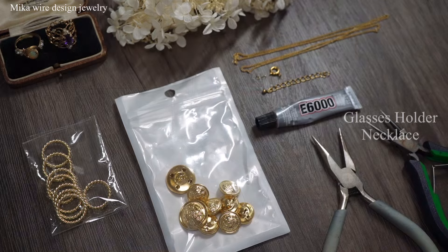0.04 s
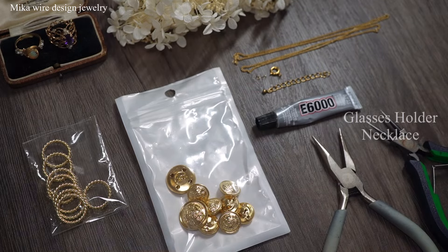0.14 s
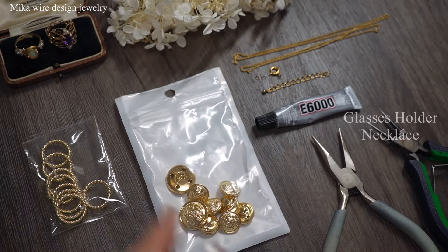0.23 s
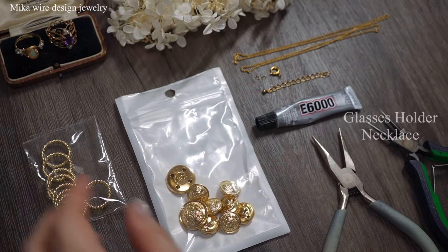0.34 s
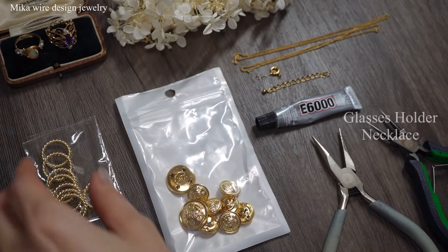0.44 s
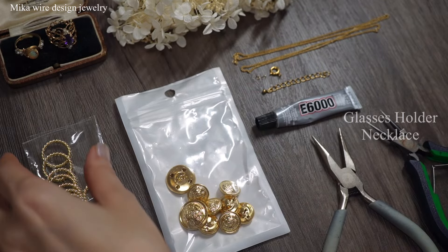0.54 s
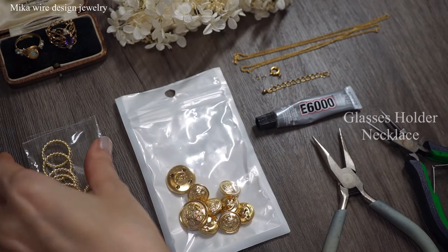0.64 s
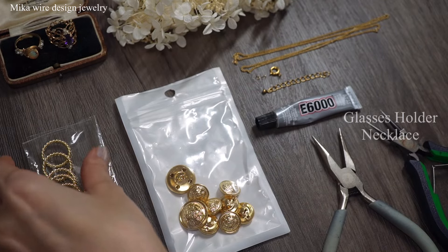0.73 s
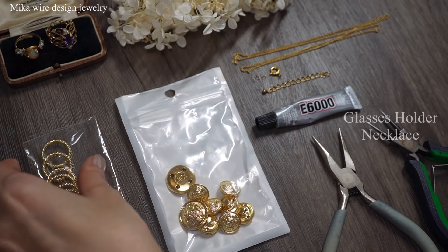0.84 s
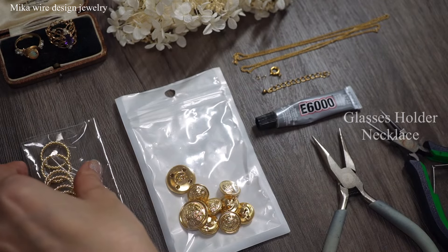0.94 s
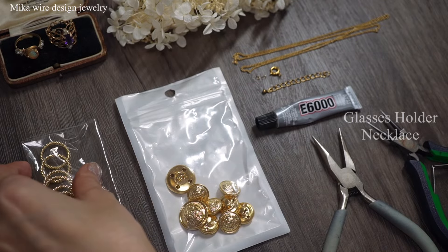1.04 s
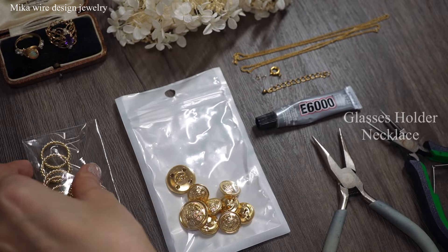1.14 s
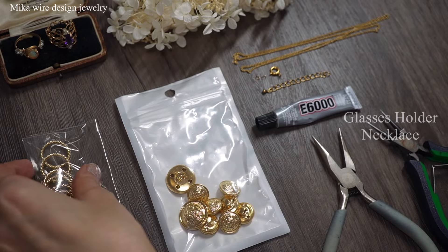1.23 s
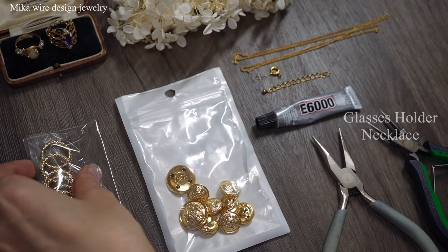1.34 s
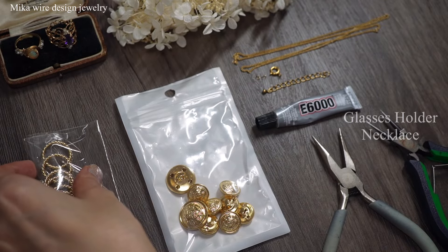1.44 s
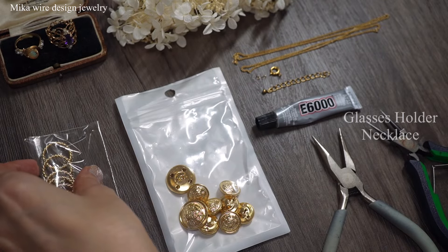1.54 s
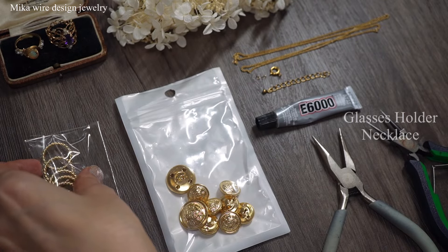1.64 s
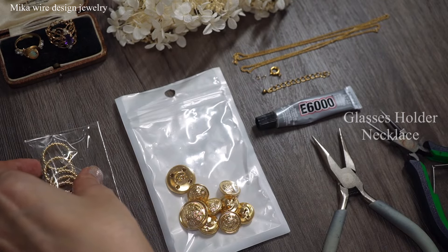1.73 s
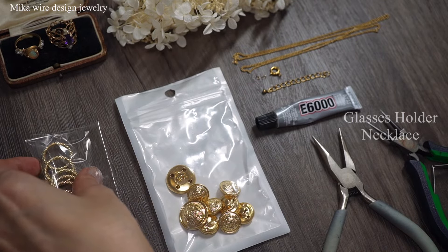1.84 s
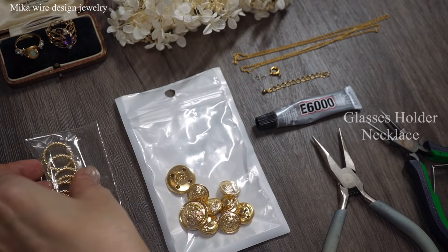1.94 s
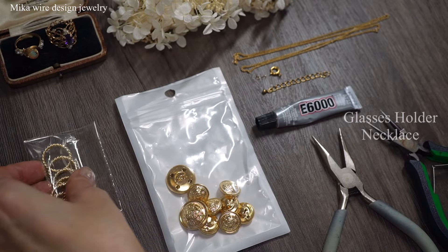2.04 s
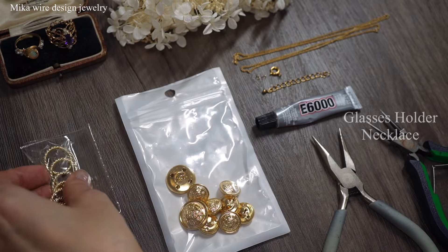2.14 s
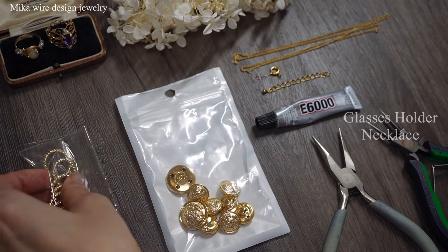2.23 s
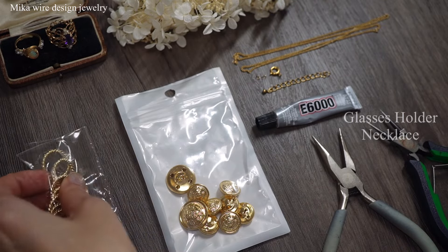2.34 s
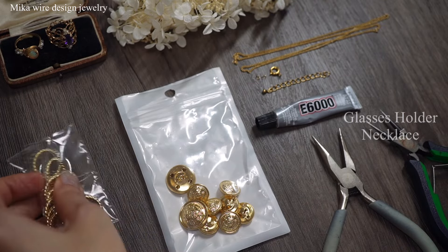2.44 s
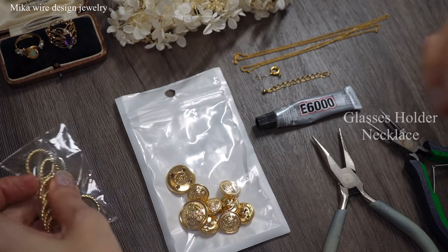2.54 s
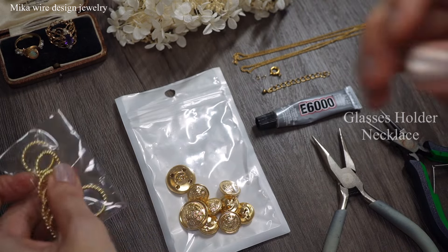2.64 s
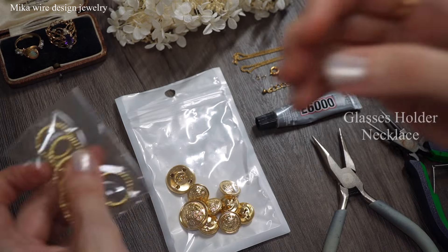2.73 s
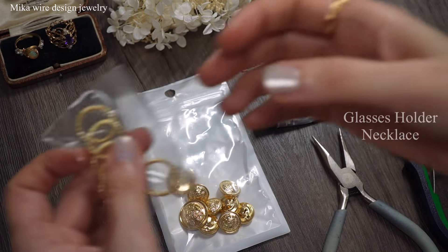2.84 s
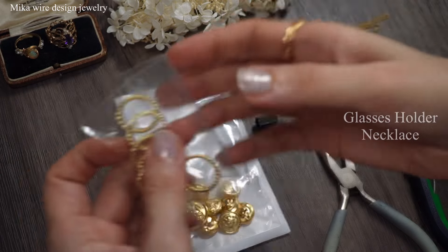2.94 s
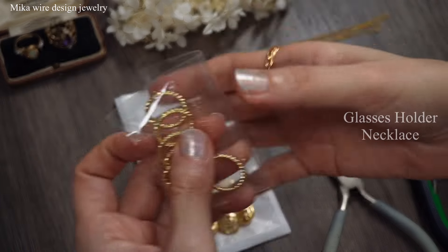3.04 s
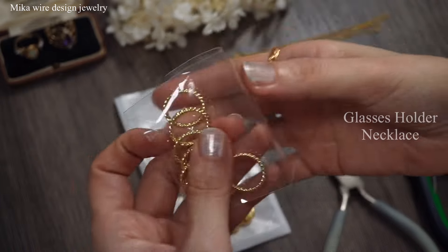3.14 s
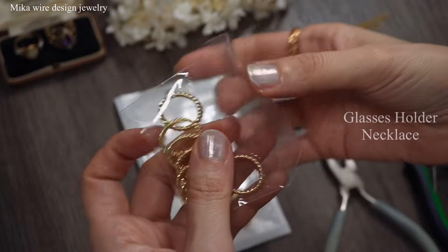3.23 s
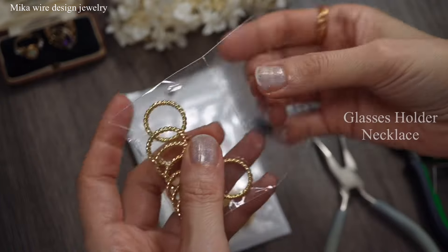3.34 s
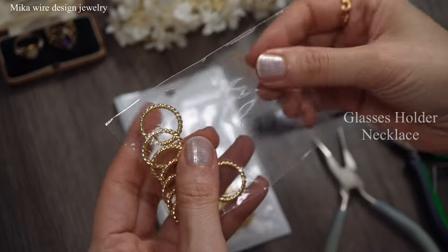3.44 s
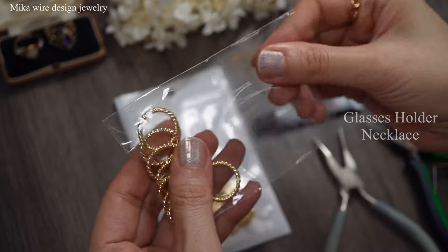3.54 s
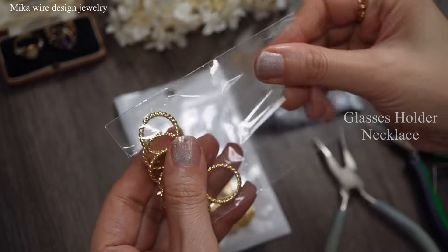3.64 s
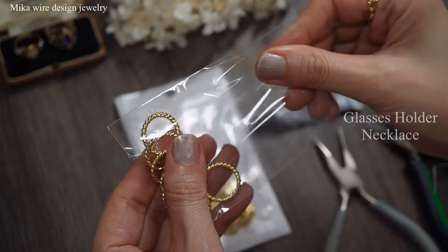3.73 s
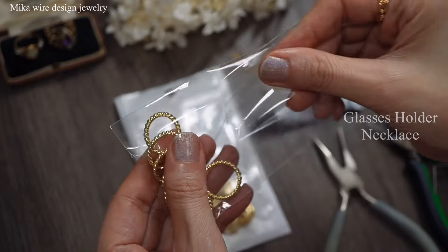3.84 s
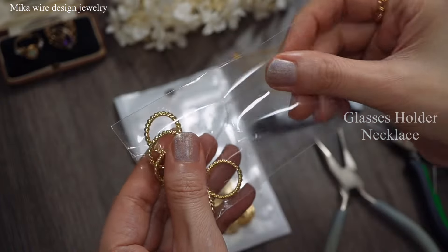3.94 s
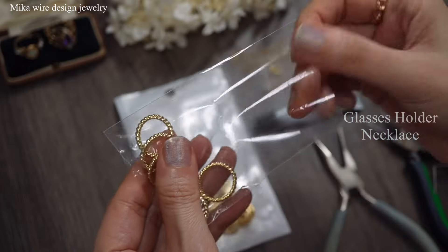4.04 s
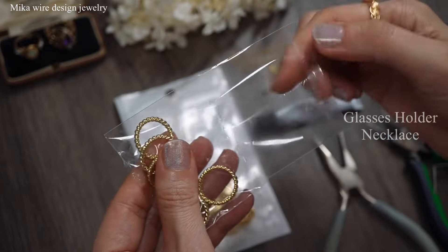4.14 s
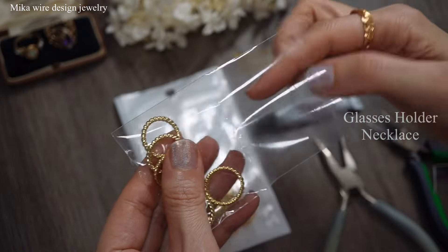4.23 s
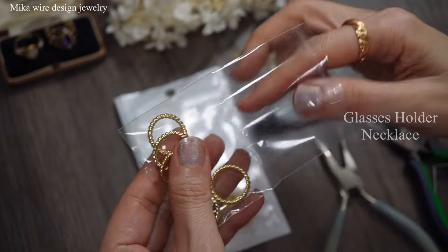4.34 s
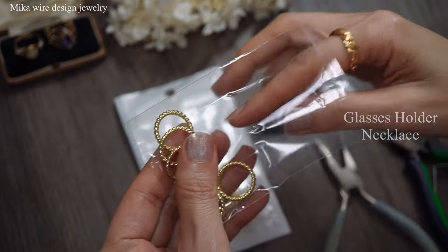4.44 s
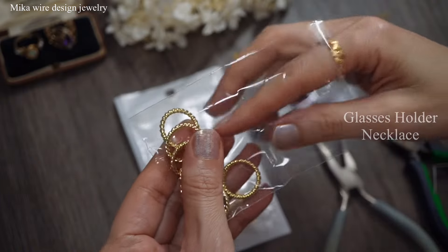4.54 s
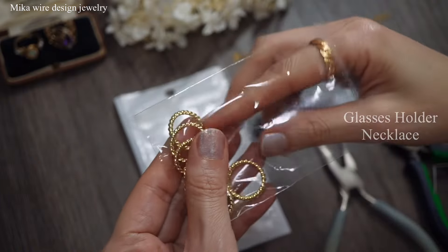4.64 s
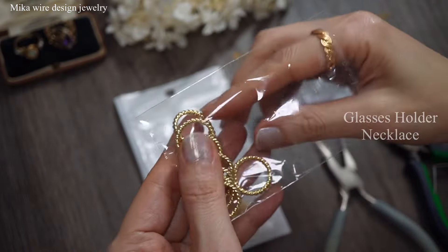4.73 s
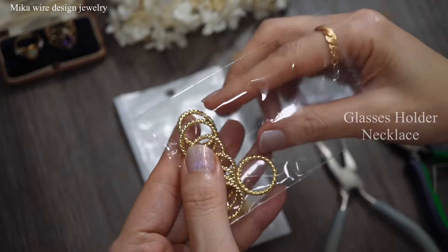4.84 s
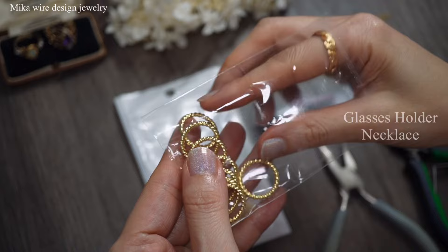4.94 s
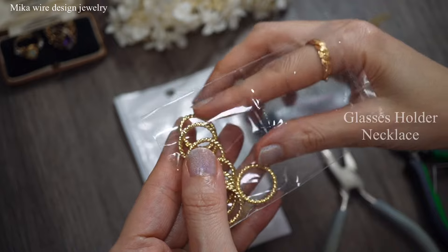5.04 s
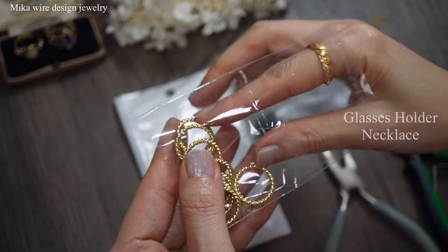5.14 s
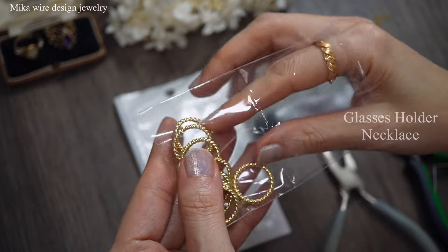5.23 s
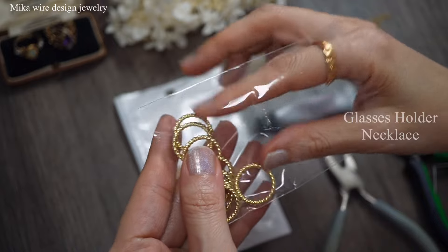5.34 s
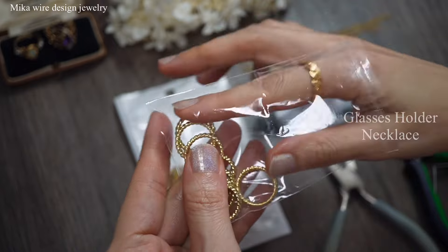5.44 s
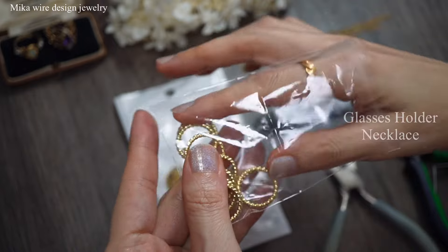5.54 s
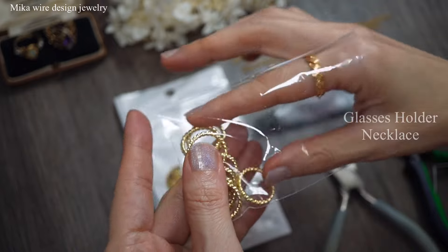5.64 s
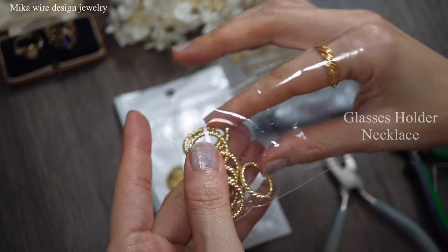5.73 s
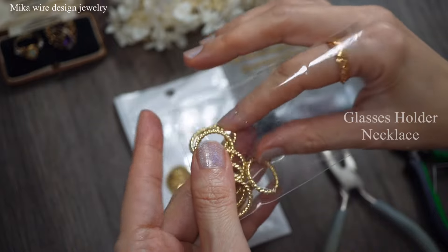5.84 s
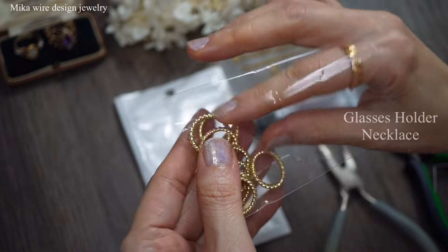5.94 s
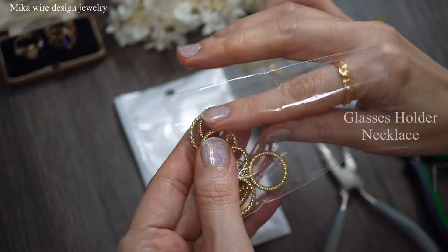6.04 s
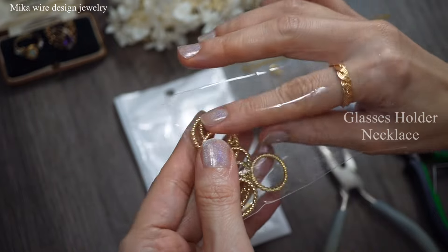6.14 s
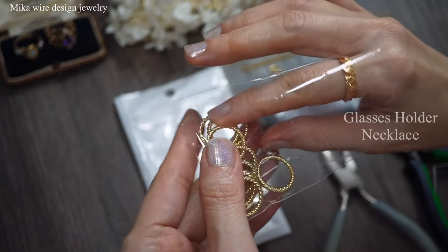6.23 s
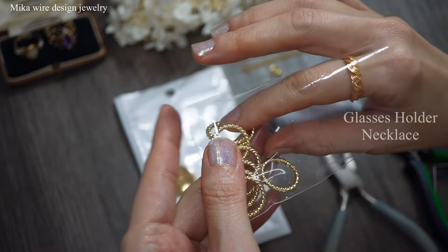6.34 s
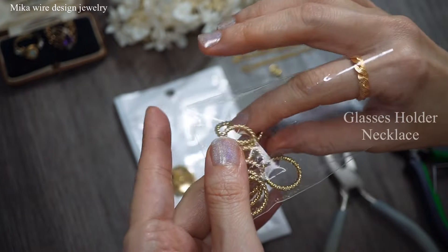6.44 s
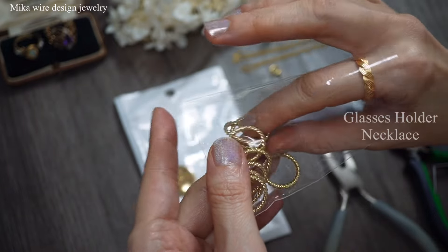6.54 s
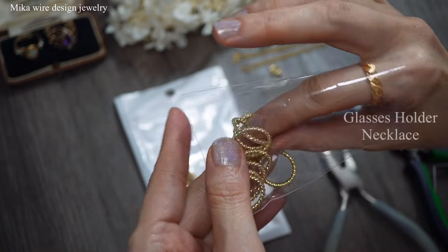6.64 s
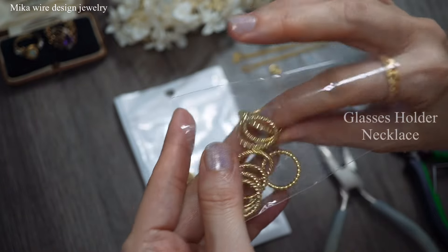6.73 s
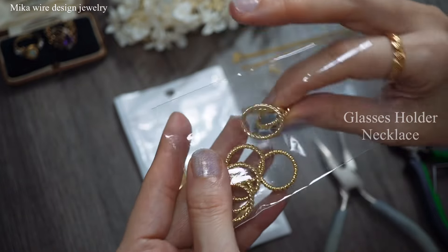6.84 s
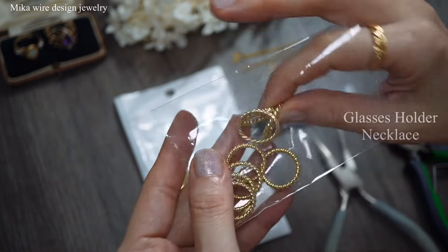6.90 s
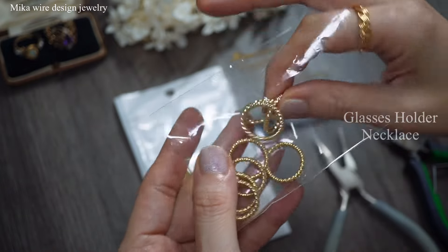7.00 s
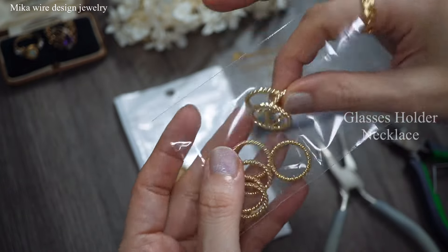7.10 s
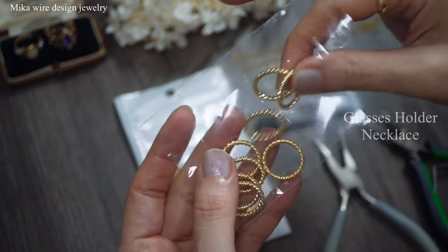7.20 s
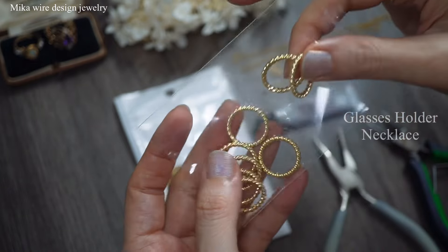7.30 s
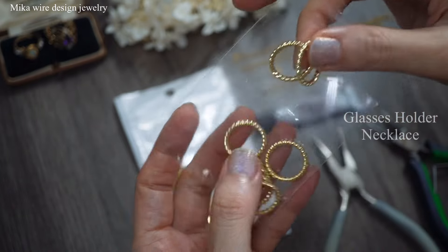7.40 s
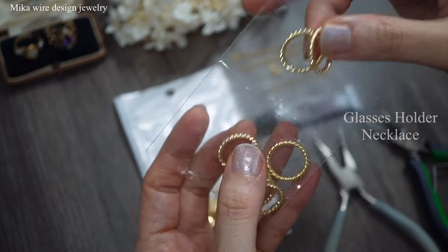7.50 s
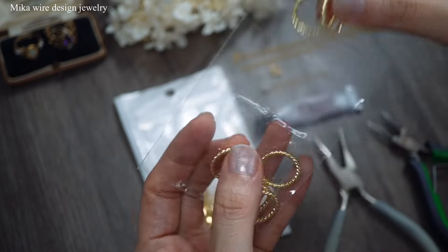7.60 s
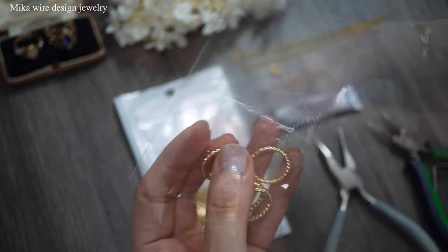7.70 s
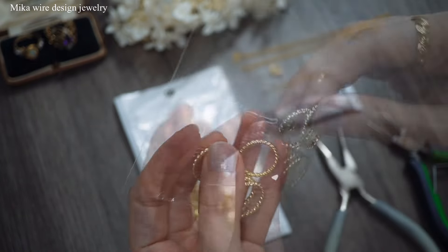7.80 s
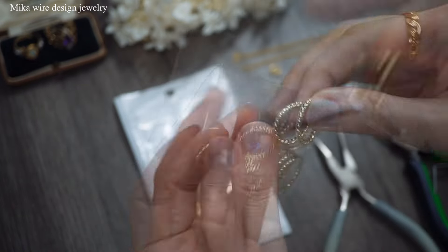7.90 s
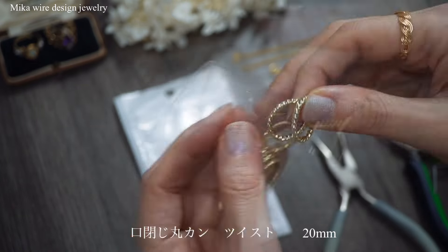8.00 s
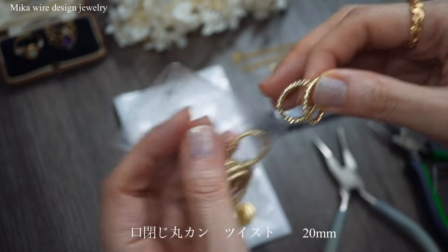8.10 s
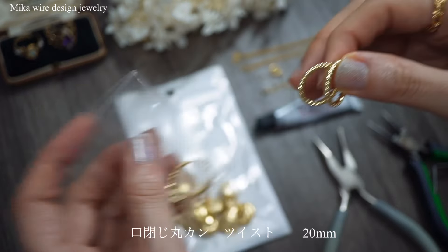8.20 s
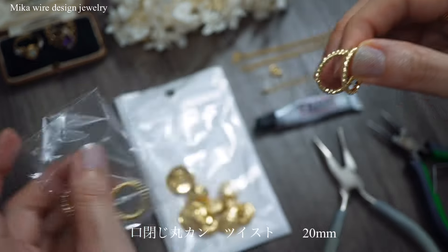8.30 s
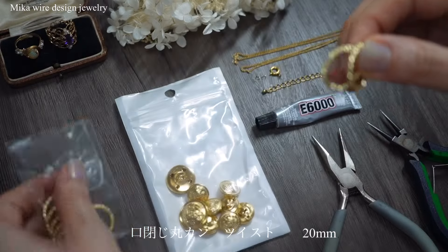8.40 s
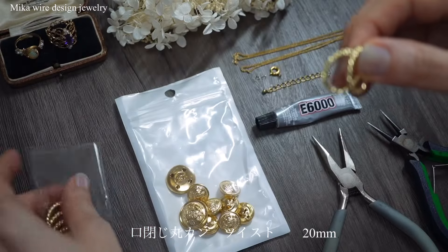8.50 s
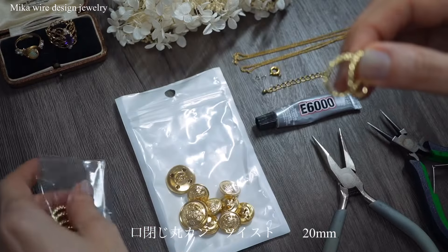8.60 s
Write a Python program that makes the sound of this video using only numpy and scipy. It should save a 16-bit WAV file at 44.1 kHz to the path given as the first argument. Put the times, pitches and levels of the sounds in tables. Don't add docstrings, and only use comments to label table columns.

```python
import sys
import numpy as np
from scipy import signal
from scipy.fft import rfft, irfft, next_fast_len
from scipy.io import wavfile
from scipy.ndimage import map_coordinates

SR = 44100
rng = np.random.default_rng(int(sys.argv[2]) if len(sys.argv) > 2 else 0)


def waveform_to_disk(signal):
    frames = np.transpose(np.atleast_2d(signal))
    scaled = np.clip(frames, -1, 1) * 32767
    samples = np.round(scaled).astype(np.int16)
    wavfile.write(sys.argv[1], SR, samples)


def convert_level_to_amplitude(level_db):
    exponent = np.asarray(level_db, float) / 20
    return 10 ** exponent


N = 381906


def unit(x):
    return x / np.sqrt(np.mean(x ** 2) + 1e-20)


def along(points, hz):
    f, v = np.transpose(points)
    return np.interp(np.log(hz + 1), np.log(f + 1), v)


def curves(rows):
    s, *cols = np.transpose(rows)
    return [np.interp(np.arange(N) / SR, s, c) for c in cols]


def filtered(x, response):
    m = next_fast_len(N + 8192)
    spectrum = rfft(x, m) * response(np.fft.rfftfreq(m, 1 / SR))
    return irfft(spectrum, m)[..., :N]


def resonance(f, hz, width):
    return 1j * f * width / (hz * hz - f * f + 1j * f * width)


def add(track, times, rows):
    at = np.round(times * SR).astype(int)[:, None] + np.arange(rows.shape[1])
    track += np.bincount(at.ravel(), rows.ravel(), N + SR)[:N]


def wobble(rate):
    return map_coordinates(rng.standard_normal(600), [np.arange(N) * rate / SR])


def envelope(times, db, rise, fall):
    t = np.arange(-2000, 6000) / SR
    hump = np.exp(np.minimum(t / rise, -t / fall))
    marks = np.bincount(np.round(times * SR).astype(int), convert_level_to_amplitude(db), N)
    return np.abs(signal.fftconvolve(marks, hump)[2000:2000 + N])


# pitch_hz [Hz], level_db [dB per Hz]
ROOM_TONE = [(12, -57), (20, -27), (165, -5.5), (195, -4), (305, -4), (342, -5.5), (521, -4.5), (652, -8.5),
             (1740, -8.5), (16500, -32.5)]
# pitch_hz [Hz], likeness [0-1]
TONE_LIKENESS = [(60, 0.79), (240, 0.88), (950, 0.82), (3770, 0.56), (15000, 0.09)]
# pitch_hz [Hz], width_hz [Hz], level_db [dB]
FAR_MACHINES = [(57.3, 23, -89.5), (90.3, 4, -88), (128, 12, -94), (197.2, 4.6, -86.5), (293.5, 5.7, -87.5),
                (314, 5.4, -93), (1140, 12, -91), (1750, 36, -95), (3670, 28, -93.5)]


def air():
    def mid_side(f):
        turn = np.arccos(np.clip(along(TONE_LIKENESS, f), -1, 1)) / 2
        return convert_level_to_amplitude(along(ROOM_TONE, f)) * np.array([np.cos(turn), np.sin(turn)])

    def machines(f):
        return sum(convert_level_to_amplitude(db) * np.sqrt(SR / np.pi / width) * resonance(f, hz, width)
                   for hz, width, db in FAR_MACHINES)

    mid, side = filtered(rng.standard_normal((2, N)), mid_side)
    hum = filtered(rng.standard_normal(N), machines)
    return convert_level_to_amplitude(-75) * unit(np.array([mid + side, mid - side])) + hum


def bursts(burst_ms, size, shiver_db, shiver_t60):
    lead = 0.002
    t = np.arange(size) / SR - lead
    luck = rng.standard_normal((len(burst_ms), 2, size))
    length = np.clip(burst_ms, .03, 8)[:, None] / 1000
    window = np.exp(-(t / (length * np.where(t < 0, .15, 1.85))) ** 4)
    slips = (0.22 + 250 * length) * luck[:, 0] * np.abs(luck[:, 0]) * window
    slips[:, round(lead * SR)] += np.sign(luck[:, 1, 0])
    slips /= np.linalg.norm(slips, axis=1, keepdims=True)
    fade_s = np.where(t < 0, lead * 2.0, shiver_t60)
    return slips + convert_level_to_amplitude(shiver_db - 60 * np.abs(t) / fade_s) * luck[:, 1]


# start_s [s], crease_level_db [dB], opened_depth_db [dB]
HANDLING = [(0.85, -67.5, 12), (1.5, -67, -9), (1.87, -62.5, 1), (2.25, -50.5, -16), (2.73, -71.5, 16),
            (3.1, -56, 1.5), (3.42, -66, 9.5), (4.0, -53, 8), (4.4, -79.5, 19), (4.58, -48.5, 7.5),
            (5.2, -67, 10), (5.44, -55.5, 7), (6.4, -59.5, 6.5), (7.14, -51, 6), (7.47, -56, 0.5),
            (7.7, -54, 6.5), (7.9, -67, 14), (8.25, -69.5, 0)]
# start_s [s], level_db [dB peak], pitch_hz [Hz], hollow_db [dB], span_ms [ms]
FOLD_TEARS = [(1.896, -34.5, 1640, -39, 1.3), (2.222, -11, 4680, -40, 0.29), (2.2534, -14, 3800, -52, 0.38),
              (2.448, -15.5, 5100, -38, 0.14), (3.2611, -10.5, 4660, -55, 0.24),
              (3.446, -31, 2200, -9, 0.5), (3.6419, -12.5, 4580, -22.5, 0.57),
              (3.923, -15.5, 4800, -13.5, 0.62), (4.549, -8, 5170, -22.5, 0.24),
              (4.567, -16, 4600, -13.5, 0.29), (4.676, -9.5, 5120, -53, 0.057),
              (4.702, -12.5, 4340, -21.5, 0.22), (5.3683, -12, 4680, -17, 0.39),
              (5.6036, -18, 4200, -43, 1.15), (5.9954, -13.5, 4760, -46, 0.45),
              (6.0178, -12, 4400, -41, 0.26), (6.112, -14.5, 6000, -53, 1.73),
              (6.3065, -10.5, 4940, -51, 0.34), (6.7761, -4, 4550, -31, 0.031),
              (7.1678, -14.5, 3450, -14.5, 0.29), (7.1927, -15.5, 5150, -12, 0.47),
              (7.3527, -19, 4560, -55.5, 0.42), (7.354, -9.5, 4640, -56, 0.11),
              (7.591, -12, 4540, -36, 0.027)]
# start_s [s], level_db [dB peak], pitch_hz [Hz]
SNAPS_TOUCH = [(0.8328, -37, 4040), (0.8498, -42.5, 4530), (0.886, -49, 3800), (0.9066, -40, 3720),
               (0.944, -51, 3020), (1.0162, -54.5, 1500), (1.055, -36.5, 5100), (1.0705, -40, 5300),
               (1.166, -53.5, 3500), (1.237, -45, 3350), (1.252, -35, 5400), (1.2975, -31.5, 3800),
               (1.428, -43.5, 5370), (1.548, -37, 4370), (1.571, -31.5, 4230), (1.604, -24.5, 5700),
               (1.702, -35, 5030), (1.805, -40, 8360), (1.868, -29, 6100), (1.8966, -23.5, 4680),
               (1.9264, -26, 4370), (1.951, -31.5, 8980), (2.0034, -28.5, 5900), (2.0288, -29.5, 3460),
               (2.0417, -24.5, 5700), (2.0963, -21.5, 4860)]
SNAPS_LIFT = [(2.135, -17, 4320), (2.171, -27.5, 4000), (2.2012, -30, 3670), (2.2066, -19, 3900),
              (2.231, -18, 6600), (2.2553, -23, 5100), (2.304, -26, 3900), (2.32, -23, 5100),
              (2.371, -23.5, 4000), (2.3995, -30.5, 3420), (2.407, -25, 4970), (2.5127, -35, 3500),
              (2.5427, -39.5, 3040), (2.604, -42, 3470), (2.6549, -31, 4700), (2.694, -30, 3880),
              (2.779, -31, 3950), (2.827, -31, 4040), (2.9337, -30, 3280), (2.95, -23.5, 4470),
              (2.9742, -28.5, 5350)]
SNAPS_OPEN = [(3.1129, -19.5, 4400), (3.1323, -25, 5040), (3.1573, -23.5, 3200), (3.1653, -22.5, 5050),
              (3.2477, -21, 4860), (3.326, -28.5, 5700), (3.361, -24.5, 4770), (3.3714, -32, 2860),
              (3.398, -25, 4600), (3.4236, -34.5, 2010), (3.4968, -20, 4840), (3.5145, -20.5, 4750),
              (3.5248, -23.5, 2420), (3.542, -17, 5460), (3.5673, -19.5, 4600), (3.6692, -23, 2830),
              (3.691, -20.5, 5600), (3.751, -26.5, 4900), (3.7624, -25, 7640), (3.7976, -28, 3530),
              (3.8599, -20.5, 5700), (3.9078, -19, 5730), (3.9447, -28.5, 1800), (3.98, -20, 4630),
              (4.181, -37.5, 4980), (4.342, -46.5, 2280)]
SNAPS_REACH = [(4.424, -29.5, 4930), (4.4486, -31, 3900), (4.4711, -25, 4400), (4.48, -23.5, 5400),
               (4.5232, -32, 5750), (4.5778, -15, 4300), (4.6066, -30.5, 3050), (4.6394, -32, 2740),
               (4.6886, -13, 4580), (4.7447, -23, 4660), (4.8647, -27, 4540), (4.8918, -30, 5030),
               (4.915, -22, 4400), (4.996, -27, 3080), (5.024, -34, 2100), (5.0395, -33.5, 2370),
               (5.0896, -36, 4600), (5.132, -35.5, 2440), (5.147, -32, 5260), (5.224, -24, 3900),
               (5.2679, -19.5, 4770), (5.2984, -22.5, 4300), (5.3242, -23.5, 5160), (5.346, -24, 2470)]
SNAPS_DIG = [(5.418, -26.5, 2490), (5.4321, -20.5, 4800), (5.448, -24.5, 4600), (5.478, -28, 2580),
             (5.517, -21.5, 3840), (5.5553, -20, 3720), (5.5778, -15.5, 3660), (5.64, -23.5, 3880),
             (5.6542, -26.5, 4230), (5.6725, -21.5, 5450), (5.7303, -25.5, 3660), (5.784, -31, 5000),
             (5.8319, -24.5, 3850), (5.8674, -24.5, 4100), (5.888, -22, 4570), (5.91, -14, 4180),
             (5.9174, -21.5, 4200), (5.956, -26.5, 3070), (5.9731, -13, 4180), (6.061, -28.5, 4100),
             (6.155, -20.5, 6200)]
SNAPS_GRIP = [(6.224, -24.5, 3600), (6.2447, -25.5, 5000), (6.262, -16.5, 5640), (6.276, -21.5, 3900),
              (6.33, -30.5, 2600), (6.3947, -21.5, 5200), (6.403, -21.5, 3370), (6.4402, -32.5, 2330),
              (6.465, -38, 4040), (6.541, -30.5, 4500), (6.5618, -22, 6760), (6.6016, -27, 3130),
              (6.7, -28.5, 4630), (6.7191, -23, 2800), (6.7326, -17, 4280), (6.7469, -20, 4250),
              (6.8024, -39, 4200), (6.8081, -20, 4200), (6.8513, -32.5, 4950), (6.879, -29.5, 2730),
              (6.9574, -35, 8200), (6.9915, -20.5, 4850), (7.034, -27, 4700), (7.048, -17.5, 3920),
              (7.117, -23, 3300), (7.243, -19.5, 3520)]
SNAPS_LOWER = [(7.284, -32.5, 4860), (7.5321, -23, 4180), (7.5358, -17.5, 6330), (7.561, -29.5, 4360),
               (7.654, -25.5, 4560), (7.69, -24, 3800), (7.7367, -42, 3960), (7.7815, -38, 3000),
               (7.8322, -29, 4400), (7.8615, -53, 1760), (7.884, -41.5, 3200), (7.9586, -33.5, 5540),
               (7.996, -32, 2920), (8.0116, -24, 3030), (8.131, -46.5, 1570), (8.1767, -41, 4260),
               (8.196, -57, 4130), (8.3252, -26.5, 4100), (8.466, -47, 2840), (8.532, -36, 5100),
               (8.624, -25.5, 3500), (8.6261, -29, 5600), (8.6442, -31.5, 5100)]
# start_s [s], level_db [dB peak], pitch_hz [Hz]
MORE_SNAPS_PICK = [(0.9402, -46, 3470), (1.085, -49, 5340), (1.5392, -46, 5150), (1.6273, -37, 8500),
                   (1.8027, -52, 8400), (1.844, -53, 5400), (1.8897, -40, 4570), (1.8938, -30, 4450),
                   (2.0645, -36, 9220), (2.1198, -41, 4370), (2.142, -32, 3220), (2.1563, -39, 2930),
                   (2.1817, -29, 3430), (2.213, -38, 3420), (2.26, -22, 5300), (2.2921, -37, 3750),
                   (2.3334, -55, 5040), (2.3759, -51, 3440), (2.3955, -51, 3430), (2.4199, -34, 4910),
                   (2.4339, -35.5, 2140), (2.496, -44.5, 1430), (2.6714, -47, 1490), (2.7403, -49, 4680),
                   (2.8435, -64, 4650), (2.8915, -50, 3060), (2.8947, -64, 4940), (2.9999, -39.5, 3060)]
MORE_SNAPS_OPEN = [(3.1435, -44, 3010), (3.1502, -50, 4950), (3.2108, -36, 5400), (3.2315, -30, 9050),
                   (3.443, -28.5, 4260), (3.4842, -46, 2020), (3.488, -31, 3190), (3.5093, -27, 4650),
                   (3.535, -31, 4630), (3.55, -27, 5800), (3.583, -44, 2730), (3.635, -30, 2050),
                   (3.7076, -28.5, 4100), (3.714, -38, 1930), (3.8126, -38, 3400), (3.819, -53, 3320),
                   (3.846, -29.5, 3030), (3.849, -38, 4910), (3.858, -22.5, 5400), (3.903, -29, 4820),
                   (3.9655, -53, 1210), (3.987, -29, 5600), (4.046, -44, 5000), (4.0497, -45, 3010),
                   (4.059, -43.5, 1550), (4.0692, -43, 1170), (4.0814, -50, 4050), (4.1855, -46, 4650),
                   (4.193, -61, 4950), (4.3313, -54.5, 1910), (4.416, -56, 2100), (4.474, -34, 4680),
                   (4.5102, -37.5, 2000), (4.54, -29.5, 4430), (4.6693, -49, 4010), (4.758, -45, 8800),
                   (4.9047, -50, 5000), (4.9068, -37, 3250), (4.9424, -57, 4260), (4.961, -41, 2630),
                   (4.9717, -40, 2800), (4.9794, -37, 4260), (4.993, -36, 4300), (5.011, -34, 4070),
                   (5.1264, -31.5, 4500), (5.1392, -31, 4850), (5.158, -44, 4180), (5.1658, -37.5, 5800)]
MORE_SNAPS_DIG = [(5.2567, -42, 5600), (5.328, -32, 5500), (5.358, -32, 3900), (5.402, -26, 2700),
                  (5.409, -29, 2840), (5.422, -36, 3190), (5.426, -26, 3060), (5.4615, -32, 4900),
                  (5.4704, -27, 4640), (5.5407, -33, 2040), (5.5436, -27, 6760), (5.5503, -27, 5400),
                  (5.56, -19.5, 5810), (5.5651, -27, 2370), (5.5914, -30, 2730), (5.598, -27, 2420),
                  (5.6622, -27, 2720), (5.666, -29, 4600), (5.7461, -31, 4170), (5.751, -35, 3100),
                  (5.815, -32, 4220), (5.8223, -37, 4010), (5.8623, -40, 4130), (5.8949, -23, 4000),
                  (5.9405, -22, 4160), (5.966, -21, 6890), (6.0124, -32, 3430), (6.0218, -14.5, 4440),
                  (6.1125, -16, 2440), (6.068, -27.5, 4650), (6.1517, -31, 5430)]
MORE_SNAPS_PULL = [(6.229, -39, 3150), (6.257, -40, 4180), (6.2964, -27, 4570), (6.3014, -23, 4220),
                   (6.473, -46, 4260), (6.478, -44, 4130), (6.5058, -52, 3100), (6.6298, -54, 4540),
                   (6.633, -56, 4310), (6.6895, -37, 3100), (6.7692, -30, 4340), (6.8014, -24, 4300),
                   (6.952, -30, 3520), (6.989, -39, 5040), (7.0054, -27.5, 4260), (7.149, -27.5, 3300),
                   (7.2384, -21.5, 9200), (7.2994, -44, 8830), (7.313, -32.5, 4000), (7.4726, -46, 8960),
                   (7.488, -40, 8870), (7.5647, -47, 4090), (7.6452, -48, 1780), (7.6686, -33, 2840),
                   (7.68, -29.5, 2790), (7.7326, -37, 8870), (7.8594, -47, 1890), (7.9568, -23, 5200),
                   (7.985, -31.5, 5870), (8.036, -43, 2890), (8.1187, -51, 2450), (8.152, -63, 4360),
                   (8.168, -49, 4280), (8.2089, -58, 5030), (8.2191, -62, 5000), (8.228, -54, 4950),
                   (8.2403, -51, 2890), (8.3144, -54, 2840), (8.3678, -41.5, 5780), (8.6293, -31, 5100)]


def snap_table():
    tears = np.array(FOLD_TEARS)
    events = [*tears[:, :3],
              *SNAPS_TOUCH, *SNAPS_LIFT, *SNAPS_OPEN, *SNAPS_REACH, *SNAPS_DIG, *SNAPS_GRIP, *SNAPS_LOWER,
              *MORE_SNAPS_PICK, *MORE_SNAPS_OPEN, *MORE_SNAPS_DIG, *MORE_SNAPS_PULL]
    s, db, hz = np.transpose(events)
    luck = rng.standard_normal((len(s), 2, 6))
    follows = np.arange(2) > 0
    load_s = 0.00098
    s = s[:, None] + load_s + follows * (0.0015 + 0.0017 * np.abs(luck[..., 0]))
    s = np.minimum(s, N / SR - .001)
    db = db[:, None] + follows * (-9.5 + 4 * luck[..., 1])
    hz = np.clip(hz[:, None] * 2.0 ** (follows * 0.3 * luck[..., 2]), 1200, 11000)

    octave = np.log2(hz / 4200)
    depth_db = curves(HANDLING)[1][np.round(s * SR).astype(int)]
    low_db = depth_db - 29.5 - 7.5 * octave + 3.5 * luck[..., 3]
    bright_db = -19 + 0.8 * octave + 7.5 * luck[..., 4]
    span_ms = 0.3436 * np.exp(0.26 * luck[..., 5])
    db[:len(tears), 1] -= 7
    low_db[:len(tears), 0], span_ms[:len(tears), 0] = tears[:, 3:].T
    return [c.ravel() for c in (s, db, hz, low_db, bright_db, span_ms)]


def snaps(table):
    s, db, hz, low_db, bright_db, span_ms = table
    lead, size = 0.002, 1536
    kick = rfft(bursts(2.05 * (span_ms - .22), size, shiver_db=-32.5, shiver_t60=0.04))
    f = np.fft.rfftfreq(size, 1 / SR)
    pitch = hz[:, None]
    facets = pitch[..., None] * 2.0 ** rng.normal(0, 0.523, (len(s), 4, 1))
    spread = (.3 + .4 * span_ms[:, None]) * pitch
    patch = resonance(f, pitch, spread)
    patch += 1.2 * resonance(f, facets, 0.05 * facets + 80).sum(1)
    patch += 1.2 * resonance(f, pitch, 0.13 * pitch)
    patch *= resonance(f, pitch, 3.47 * spread)
    hollow = resonance(f, 1580, 680) + 0.4 * resonance(f, 636, 1000)
    hollow *= resonance(f, 1137, 700)
    tick = resonance(f, 9800, 6000) ** 2

    fold_s = rng.uniform(.0003, .0014, (len(s), 1))
    kick = kick * (1 - 0.4 * np.exp(-2j * np.pi * f * fold_s))
    rows = 0
    for part, part_db in ((patch, 0 * db), (hollow, low_db), (tick, bright_db)):
        wave = irfft(kick * part)
        wave /= np.abs(wave).max(1, keepdims=True)
        rows = rows + wave * convert_level_to_amplitude(db + part_db - 1.5)[:, None]
    track = np.zeros(N)
    add(track, s - lead, rows)
    return track


# pitch_hz [Hz], level_db [dB per Hz]
CREASE_SPECTRUM = [(180, -28), (300, -32), (820, -16.5), (1090, -10), (1580, -5), (2060, -3.5), (4170, 1),
                   (8160, -6), (9180, -2), (14700, -25), (16500, -65.5)]


def creases(per_second, size_db, clump_db):
    luck = rng.random((4400, 3))
    s = np.sort(luck[:, 0]) * len(luck) / per_second
    hz = 1500 * 8.1 ** luck[:, 1, None]
    f = np.fft.rfftfreq(256, 1 / SR)
    kick = rfft(bursts(np.full(len(s), .2), size=256, shiver_db=-23.0, shiver_t60=0.023))
    rows = irfft(kick * (resonance(f, hz, 2.0 * hz) + 0.054))
    rows *= convert_level_to_amplitude(-size_db * np.log(1.02 - luck[:, 2:]))
    track = np.zeros(N)
    inside = s < N / SR
    add(track, s[inside], rows[inside])
    bed = unit(track * convert_level_to_amplitude(clump_db * wobble(40))) + .6 * rng.standard_normal(N)
    return unit(filtered(bed, lambda f: convert_level_to_amplitude(along(CREASE_SPECTRUM, f))))


# start_s [s], level_db [dB]
FINGER_SLIDES = [(3.309, -44), (3.379, -48), (3.407, -49), (3.553, -66), (5.14, -55), (7.735, -47.5),
                 (7.787, -50.5), (7.967, -52), (8.129, -61), (8.235, -62), (8.26, -63), (8.35, -66),
                 (8.561, -54.5)]


def rustle(table):
    s, db = table[:2]
    bed_db, opening_db = curves(HANDLING)
    aftershock = envelope(s, db - 31, rise=0.0018, fall=0.012)
    touched = np.arange(N) > 0.82 * SR
    slide = convert_level_to_amplitude(bed_db - 5.5) * touched
    slide = slide + envelope(*np.transpose(FINGER_SLIDES), rise=0.013, fall=0.0091)
    bed = creases(per_second=500, size_db=2.5, clump_db=4)
    deep = filtered(bed, lambda f: 1 / (1 + (f / 1300) ** 4))
    treble = filtered(bed, lambda f: 1 - 1 / (1 + (f / 7000) ** 4))
    dull = convert_level_to_amplitude(np.minimum(-16.5 + 2.8 * (bed_db + 60.5), 0)) - 1
    opened = bed + (convert_level_to_amplitude(opening_db) - 1) * deep
    return (slide + aftershock) * opened + slide * dull * treble


# start_s [s], table_ms [ms], hand_ms [ms]
BOUNCE_DELAYS = [(3.7, .83, .35), (4.4, .8, .44), (8.2, .84, .43)]


def bounced(x):
    def late(ms):
        return map_coordinates(x, [np.arange(N) - ms * (1 + .05 * wobble(9)) * SR / 1000])

    table_ms, hand_ms = curves(BOUNCE_DELAYS)
    return x - 0.22 * late(table_ms) + 0.17 * late(hand_ms)


# start_s [s], level_db [dB peak]
RING_TOUCHES = [(1.619, -50), (1.701, -60), (1.915, -52), (1.944, -68), (2.0444, -55), (3.241, -46),
                (4.6608, -62), (4.7144, -45), (4.7346, -44), (4.7564, -63), (5.955, -60), (6.32, -66),
                (6.678, -57), (6.79, -52), (6.88, -57), (6.9614, -48), (7.0484, -61), (7.113, -46),
                (7.156, -45), (7.2614, -49), (7.3148, -48.5), (7.3694, -45), (7.503, -51.5), (7.672, -58),
                (7.7323, -48.5)]
# pitch_hz [Hz], width_hz [Hz], level_db [dB]
RING_MODES = [(8860, 45, -4), (8975, 45, -2), (9140, 70, -4), (9330, 90, -5)]


def rings():
    s, db = np.transpose(RING_TOUCHES)
    grate = rng.standard_normal(N) ** 3 + 3.3 * rng.standard_normal(N)
    grate *= envelope(s + 0.0014, db, rise=0.007, fall=0.023)
    song = np.zeros(N)
    for hz, width, mode_db in RING_MODES:
        mode = filtered(grate, lambda f: resonance(f, hz, width) * resonance(f, 9100, 1100))
        song += convert_level_to_amplitude(mode_db + 2.6 * wobble(22)) * mode
    return convert_level_to_amplitude(4.5) * song


# pitch_hz [Hz], width_hz [Hz], level_db [dB]
PALM_MODES = [(1085, 170, -4), (2180, 600, -10.5)]
# start_s [s], held [0-1]
PALM_HOLD = [
    (2.85, 0.6),
    (3.05, 1),
    (7.45, 1),
    (7.62, 0),
]


def palm(x):
    def cavity(f):
        ringing = sum(convert_level_to_amplitude(db) * resonance(f, hz, width) for hz, width, db in PALM_MODES)
        return (1 - 0.38 * resonance(f, 1480, 600)) * (1 + ringing)

    held = np.clip(curves(PALM_HOLD)[0], 0, 1)
    return held * filtered(x, cavity) + (1 - held) * x


# start_s [s], left_over_right_db [dB]
BAG_SIDE = [(0.8, 3), (1.4, 4.5), (2.7, 2.5), (4.2, 0.4), (5.7, 0.5), (6.7, 1), (7.8, .5), (8.5, 3)]
# pitch_hz [Hz], level_db [dB]
PORT_DIFFERENCE = [(500, -28), (1400, -31.5), (2800, -15), (5600, -10.5), (9500, -2.5), (15000, -7)]


def ports(x):
    def path(turn):
        return filtered(x, lambda f: convert_level_to_amplitude(along(PORT_DIFFERENCE, f)) * turn(f))

    odd = 1.6 * np.sin(wobble(35)) * path(lambda f: 1j)
    odd = odd + 0.2 * np.sin(wobble(27)) * path(lambda f: np.exp(-2j * np.pi * f * 0.00023))
    pan_db = curves(BAG_SIDE)[0]
    return np.array([x + odd, x - odd]) * convert_level_to_amplitude(np.array([pan_db, -pan_db]) / 2)


# pitch_hz [Hz], t60_s [s]
ROOM_DECAY = [(500, 0.89), (2500, 0.23), (5500, 0.3), (13000, 0.19)]


def room(x):
    wet, step = np.zeros((2, N + SR)), SR // 3
    for start in range(0, N, step):
        hz, t, z = signal.stft(rng.standard_normal((2, SR // 4)), SR, nperseg=256)
        decay = convert_level_to_amplitude(-60 * t / along(ROOM_DECAY, hz)[:, None])
        tail = signal.istft(z * decay, SR, nperseg=256)[1]
        tail = 1.0 * tail[0] + 0.38 * tail
        tail = tail / np.linalg.norm(tail[0])
        part = signal.fftconvolve(x[None, start:start + step], tail, axes=1)
        wet[:, start + 90:start + 90 + part.shape[1]] += part
    return wet[:, :N]


def scene():
    table = snap_table()
    bag = palm(bounced(snaps(table)) + rustle(table)) + rings()
    return ports(bag) + convert_level_to_amplitude(-13) * room(bag) + air()


def top_cut(x):
    return signal.sosfilt(signal.butter(12, 16990, fs=SR, output="sos"), x)


def record(dry):
    mix = filtered(dry, lambda f: 1 / (1 + (f / 15500) ** 60))
    return top_cut(mix)


dry = scene()
out = record(dry)
waveform_to_disk(out)
```